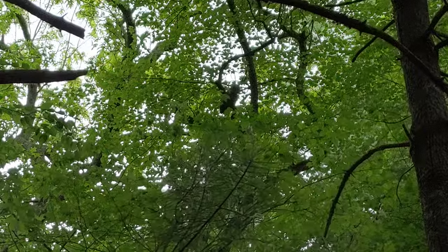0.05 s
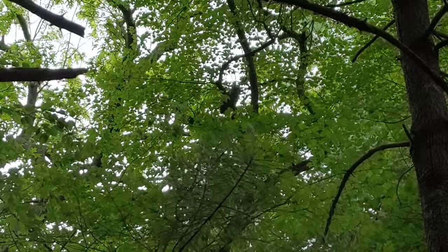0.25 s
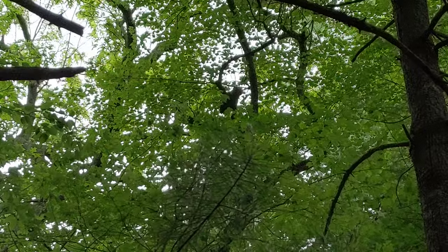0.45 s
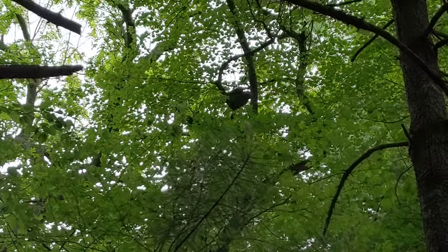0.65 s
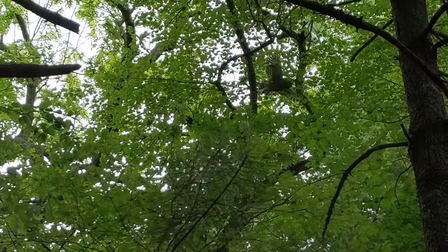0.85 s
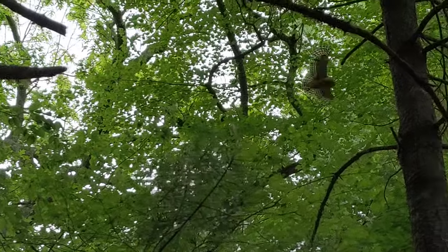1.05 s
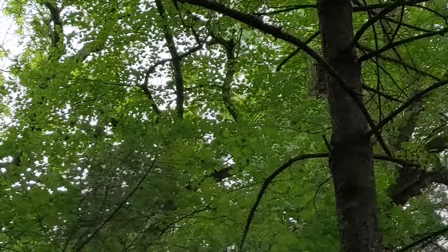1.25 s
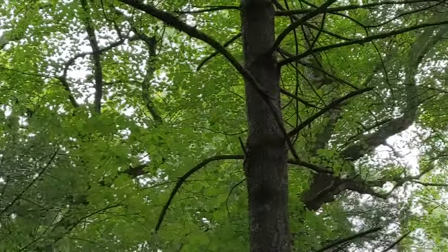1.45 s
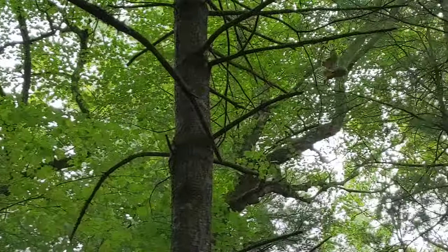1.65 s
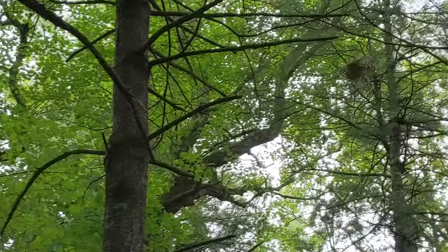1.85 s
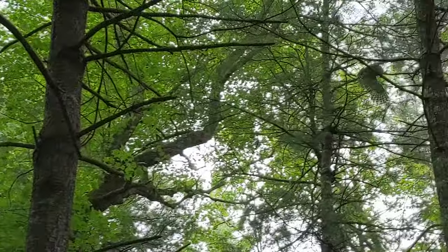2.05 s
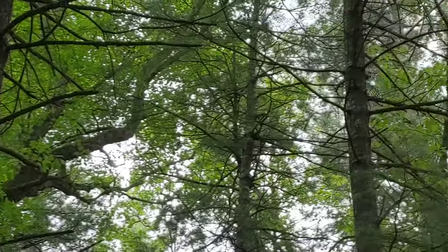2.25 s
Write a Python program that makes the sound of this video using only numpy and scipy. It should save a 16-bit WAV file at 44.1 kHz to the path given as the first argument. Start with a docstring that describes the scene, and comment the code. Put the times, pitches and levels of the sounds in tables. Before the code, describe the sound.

Soft forest hiss with a sharp microphone pop and faint, high birdsong.

```python
"""Quiet wood in leaf

A stereo microphone stands in a soft hiss of air over a low rumble. Far off to the right a songbird
arrives mostly as echo among the trees; hard right, a small bird gives one thin, very high, wavering
whistle. The microphone comes on with a sharp electrical pop and later crackles briefly twice, as its
resting voltage jumps and settles. A faint, distant hum joins near the end."""
import sys
import numpy as np
from scipy import signal
from scipy.fft import rfft, irfft
from scipy.io import wavfile
from scipy.ndimage import uniform_filter1d

SR = 44100
rng = np.random.default_rng(int(sys.argv[2]) if len(sys.argv) > 2 else 0)


def waveform_to_disk(signal):
    """Save audio, clipped to [-1, 1], as 16-bit WAV at the path in sys.argv[1]."""
    frames = np.transpose(np.atleast_2d(signal))
    scaled = np.clip(frames, -1, 1) * 32767
    samples = np.round(scaled).astype(np.int16)
    wavfile.write(sys.argv[1], SR, samples)


N = 101429
TIME = np.arange(N) / SR
FREQS = np.maximum(np.fft.rfftfreq(N, 1 / SR), 1)

# The songbird's notes, from far off among the trees on the right.
# Each row: start in seconds, length in seconds, pitch in Hz, width in Hz, right-side level in dB.
SONG_NOTES = [(.17, 0.052, 2570, 190, -70.5), (.17, 0.071, 2899, 55, -69.5),
              (0.173, 0.048, 3390, 201, -73.5), (0.168, 0.055, 3710, 68.6, -73),
              (.17, 0.073, 2920, 700, -73.5), (0.505, 0.036, 2590, 100, -79),
              (1.07, 0.13, 3170, 250, -77.5), (1.186, .07, 3470, 380, -78), (1.407, 0.16, 4110, 160, -79.5),
              (1.49, 0.098, 3870, 159, -80), (1.606, 0.035, 3470, 110, -78.5),
              (1.74, 0.087, 2656, 70.5, -81.5), (1.74, .1, 3100, 200, -80.5), (1.80, .05, 3750, 300, -75),
              (1.92, .06, 4180, 170, -76), (1.953, 0.051, 3750, 193, -76.5), (1.986, 0.096, 3450, 170, -75),
              (2.04, 0.11, 3130, 160, -74), (2.096, 0.14, 2630, 400, -77), (2.237, 0.054, 3320, 100, -71.5)]
SONG_RISE_S, FOREST_T60_S, SONG_LEFT_DB = 0.01, 1.4, -10.5


def far_song():
    """The trees smear each note into a narrow band of noise that swells, holds and dies away."""
    song = np.zeros((2, N))
    for start, length, hz, width, db in SONG_NOTES:
        swell = np.clip((TIME - start) / SONG_RISE_S, 0, 1)
        fade = np.exp(-np.log(1000) * np.maximum(TIME - start - length, 0) / FOREST_T60_S)
        song += from_db(db) * swell * fade * np.array([noise_band(hz, width) for _ in range(2)])
    return song * [[from_db(SONG_LEFT_DB)], [1]]


# The small bird, hard right of the microphone, with one list for each strand of its whistle.
# Each row: time in seconds, pitch in Hz, relative level in dB.
WHISTLE_STRANDS = [
    [(1.103, 10800, -91), (1.12, 11950, -71.5), (1.16, 13000, -72), (1.21, 12350, -82), (1.232, 12950, -70),
     (1.25, 13550, -81), (1.283, 13600, -80), (1.305, 12500, -68.5), (1.325, 13400, -80)],
    [(1.33, 13950, -77), (1.355, 14100, -83), (1.378, 13300, -83), (1.39, 13300, -73), (1.41, 12980, -78),
     (1.445, 13200, -79)],
    [(1.245, 10600, -88), (1.265, 10800, -79), (1.283, 11400, -94)],
    [(1.457, 9200, -79), (1.485, 9640, -77), (1.53, 9970, -78), (1.56, 9500, -93)],
    [(1.465, 12300, -82), (1.51, 12720, -82), (1.55, 12400, -84), (1.585, 11600, -83)],
    [(1.53, 14300, -94), (1.58, 12950, -84), (1.615, 11700, -78.5), (1.645, 10700, -95)],
]
WHISTLE_GAIN_DB, WHISTLE_LEFT_DB, LEAF_ECHO_DB, LEAF_T60_S = 1.5, -29, -8, 0.32
GLIDE_S, QUAVER_DEPTH_HZ, QUAVER_PER_S = 0.0092, 44.6, 157
ROUGH_DEPTH, ROUGH_PER_S = 0.35, 250
FIZZ_HZ, FIZZ_WIDTH_HZ, FIZZ_DB, FIZZ_SMEAR_S = 11200, 4300, -1, 0.13


def whistle():
    """Thin gliding sines with a slight quaver, an airy fizz and a short scatter from the leaves."""
    voice = np.zeros(N)
    glide = int(GLIDE_S * SR)
    for strand in WHISTLE_STRANDS:
        times, hz, db = np.transpose(strand)
        pitch = uniform_filter1d(np.interp(TIME, times, hz), glide)
        pitch += QUAVER_DEPTH_HZ * noise_band(0, QUAVER_PER_S)
        sounding = (TIME > times[0]) & (TIME < times[-1])
        level = uniform_filter1d(from_db(np.interp(TIME, times, db)) * sounding, glide)
        level *= 1 + ROUGH_DEPTH * noise_band(0, ROUGH_PER_S)
        voice += np.sqrt(2) * level * np.sin(2 * np.pi * np.cumsum(pitch) / SR)
    envelope = uniform_filter1d(np.abs(voice), int(FIZZ_SMEAR_S * SR))
    fizz = from_db(FIZZ_DB) * envelope * noise_band(FIZZ_HZ, FIZZ_WIDTH_HZ)
    leaves = rng.standard_normal((2, N)) * np.exp(-np.log(1000) * TIME / LEAF_T60_S)
    echo = signal.fftconvolve(voice[None], rms_one(leaves) / np.sqrt(N))[:, :N]
    bird = voice + fizz + from_db(LEAF_ECHO_DB) * echo
    return from_db(WHISTLE_GAIN_DB) * bird * [[from_db(WHISTLE_LEFT_DB)], [1]]


# Jumps of the resting voltage, inside the microphone itself.
# Each row: time in seconds, relative height in dB, direction (1 up, -1 down).
VOLTAGE_JUMPS = [(.2002, -0.5, -1), (0.4735, -35, -1), (1.8663, -19.5, 1), (1.875, -20.5, -1)]
# The colour of a pop. Each row: frequency in Hz, left gain in dB, right gain in dB.
POP_COLOUR = [(20.7, -23.5, -23.5), (61, -19, -23), (129, -15, -20), (276, -9, -12.5), (465, -7, -11.5),
              (700, -11, -15), (980, -12, -22.5), (1300, -15, -42), (1580, -14, -21), (1950, -16.5, -50),
              (2470, -9, -35), (3300, -8, -33), (4000, -6.5, -53), (4800, -10.5, -42), (5720, -6, -41),
              (6560, -9, -47), (7660, -5, -39), (8230, -14, -46), (9400, -8.5, -37), (10700, -22, -38),
              (12800, -21, -35), (14400, -28, -50), (15600, -11, -61)]
# Phase between a pop's two sides. Each row: frequency in Hz, lead of the left in radians.
POP_PHASE = [(10, 0), (40, -0.9), (100, -1.26), (250, -2.5), (550, -2.5), (1000, -1.5), (1600, 0.5)]
SETTLE_S, POP_GAIN_DB, POP_BASS_DB, POP_BASS_HZ = 0.012, -0.5, 1.5, 71


def pops():
    """Each voltage jump settles back to rest: a sharp click on the left, a dull knock on the right."""
    kicks = np.zeros(N)
    for start, db, direction in VOLTAGE_JUMPS:
        kicks[int(start * SR)] += direction * from_db(db + POP_GAIN_DB)
    voltage = signal.lfilter([1], [1, -np.exp(-1 / (SETTLE_S * SR))], kicks + 1e-18)
    phase_shift = np.exp(0.5j * over_hz(POP_PHASE) * [[1], [-1]])
    colour_db = over_hz(POP_COLOUR) + POP_BASS_DB / (1 + (FREQS / POP_BASS_HZ) ** 2)
    return irfft(rfft(voltage) * from_db(colour_db) * phase_shift, N)


def contact_sizzle(level_db=-59.5):
    """The contact spits electrical noise on the left between the last two voltage jumps."""
    between = (TIME > VOLTAGE_JUMPS[-2][0]) & (TIME < VOLTAGE_JUMPS[-1][0])
    return from_db(level_db) * between * noise_band(centre_hz=5400, width_hz=7700) * [[1], [0]]


# Forest air all around the microphone, before its level drifts.
# Each row: frequency in Hz, left density in dB per Hz, right density in dB per Hz.
AIR_SPECTRUM = [(20, -82, -80.5), (57.7, -88.5, -88), (131, -97, -95), (294, -96.5, -92.5),
                (447, -99, -96.5), (687, -101, -100), (980, -106, -106), (1280, -109, -111),
                (1610, -109, -109), (1900, -112, -113), (2520, -107, -111), (3300, -105, -110),
                (3990, -106, -109), (4960, -108, -112), (5720, -105, -110), (6520, -107, -116),
                (7720, -105, -113), (8100, -110, -116), (9500, -110, -114), (10800, -118, -118),
                (13300, -123, -121), (14300, -119, -122), (15600, -118, -127)]
# How alike the air is on the two sides. Each row: frequency in Hz, correlation from -1 to 1.
AIR_LIKENESS = [(60, 0.8), (110, 0.35), (200, 0.3), (380, -0.34), (700, 0.013), (1290, 0.4), (2380, 0.02),
                (4400, -0.062), (8120, 0.029), (15000, 0.064)]
# The hiss drifts a little. Each row: time in seconds, gain in dB.
HISS_DRIFT = [(.2, 0.9), (.55, -0.1), (.95, -.3), (1.2, 0.4), (1.8, -0.5), (2.13, 1.47), (2.3, -1.1)]
# The rumble comes up after about half a second. Each row: time in seconds, gain in dB.
RUMBLE_DRIFT = [(.2, -7), (.43, -10.5), (.52, -1), (.7, 0), (.9, -0.5), (1.8, 0), (2.3, -0.5)]
RUMBLE_BELOW_HZ, FLICKER_DB, FLICKER_PER_S = 180, 0.5, 4.6


def forest_air():
    """Soft hiss and low rumble, alike on both sides in the deep bass and unrelated in the treble."""
    mid, side = rfft(rng.standard_normal((2, N)))
    alike = over_hz(AIR_LIKENESS)[0]
    white = np.sqrt(1 + alike) * mid + np.sqrt(1 - alike) * side * [[1], [-1]]
    spectrum = white * from_db(over_hz(AIR_SPECTRUM)) * np.sqrt(SR) / 2
    bass = 1 / (1 + (FREQS / RUMBLE_BELOW_HZ) ** 4)
    flicker = from_db(FLICKER_DB * noise_band(0, FLICKER_PER_S))
    hiss = irfft(spectrum * (1 - bass), N) * over_time(HISS_DRIFT) * flicker
    rumble = irfft(spectrum * bass, N) * over_time(RUMBLE_DRIFT)
    return hiss + rumble


def air_puff(peak_s=0.68, width_s=0.13, peak_db=-52):
    """One slow push of air on the microphone, more felt than heard."""
    return from_db(peak_db) * np.exp(-((TIME - peak_s) / width_s) ** 2)


def far_hum(start_s=1.89, rise_s=0.12, level_db=-77):
    """A faint wavering tone, perhaps distant traffic."""
    swell = np.clip((TIME - start_s) / rise_s, 0, 1)
    return from_db(level_db) * swell * noise_band(centre_hz=444, width_hz=10)


def from_db(db):
    """Decibels to gain."""
    return 10 ** (np.asarray(db) / 20)


def rms_one(x):
    """Scale to unit power."""
    return x / np.sqrt(np.mean(x ** 2) + 1e-20)


def over_hz(rows):
    """Each column of a table, joined on a log-frequency axis."""
    hz, *columns = np.transpose(rows)
    return np.array([np.interp(np.log(FREQS), np.log(hz), column) for column in columns])


def over_time(rows):
    """A level curve in dB as a gain for every sample."""
    return from_db(np.interp(TIME, *np.transpose(rows)))


def noise_band(centre_hz, width_hz):
    """Unit-power noise in a bell-shaped band; centred on 0 Hz it is a random wobble."""
    bell = np.exp(-2 * ((FREQS - centre_hz) / width_hz) ** 2)
    return rms_one(irfft(rfft(rng.standard_normal(N)) * bell, N))


def scene(on_s=0.1965, fade_in_s=0.002):
    """Silence until the microphone comes on, then the wood and the electrical noises."""
    wood = forest_air() + air_puff() + far_hum() + far_song() + whistle()
    microphone_on = np.clip((TIME - on_s) / fade_in_s, 0, 1)
    return (wood + pops() + contact_sizzle()) * microphone_on


def record(dry, cutoff_hz=15850, edge_hz=120):
    """The highest treble is cut steeply."""
    hz = np.fft.rfftfreq(2 * N, 1 / SR)
    lowpass = 0.5 * (1 - np.tanh((hz - cutoff_hz) / edge_hz))
    return irfft(rfft(dry, 2 * N) * lowpass)[:, :N]


dry = scene()
out = record(dry)
waveform_to_disk(out)
```